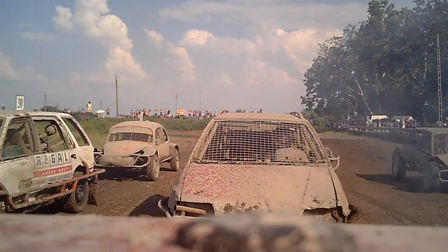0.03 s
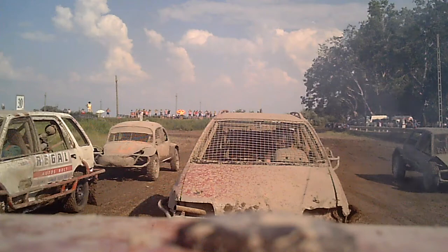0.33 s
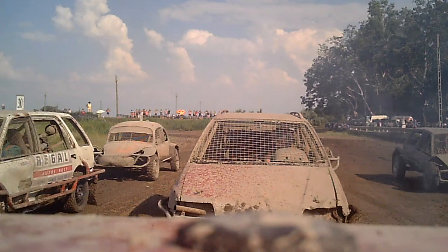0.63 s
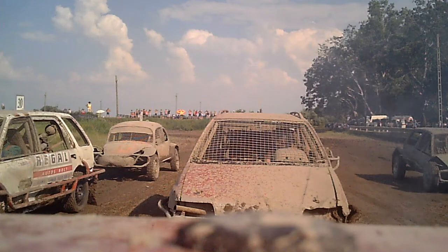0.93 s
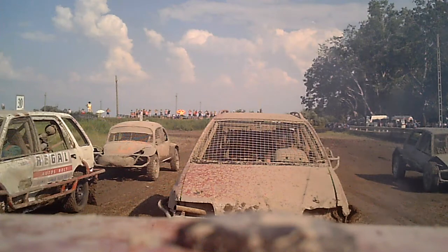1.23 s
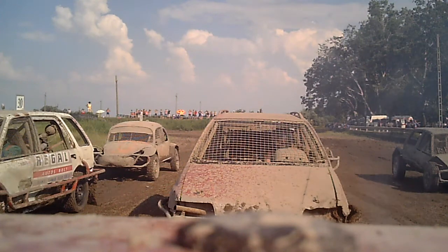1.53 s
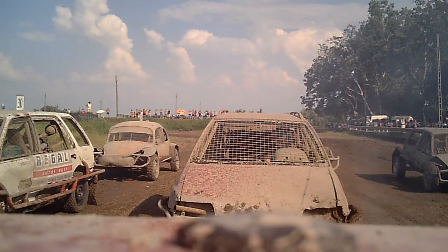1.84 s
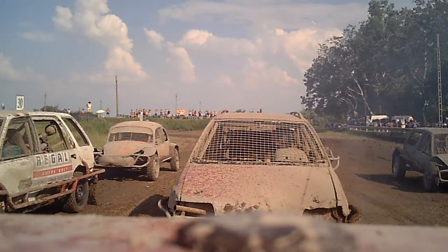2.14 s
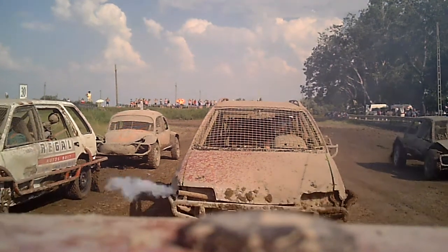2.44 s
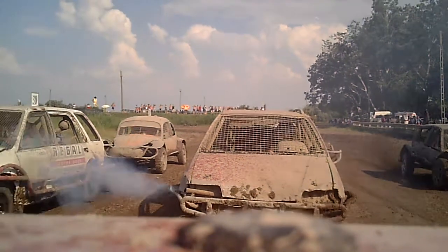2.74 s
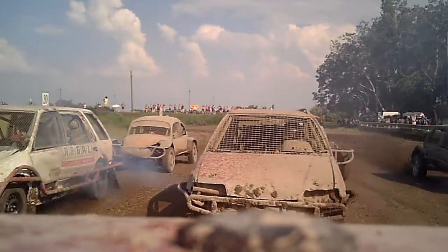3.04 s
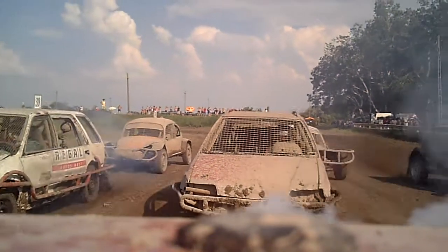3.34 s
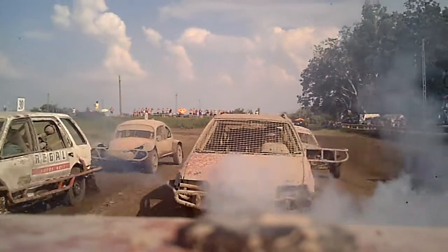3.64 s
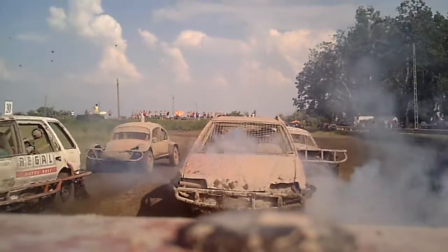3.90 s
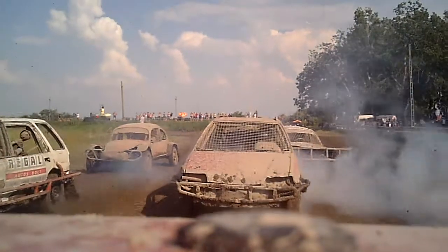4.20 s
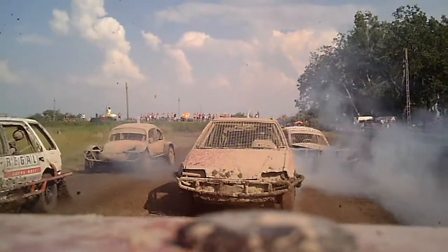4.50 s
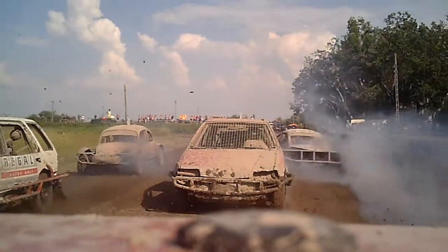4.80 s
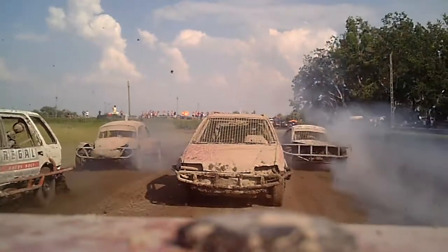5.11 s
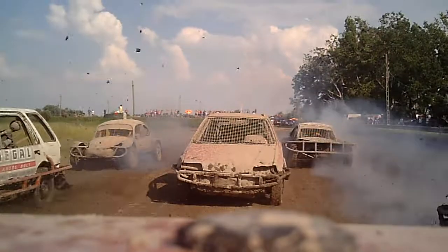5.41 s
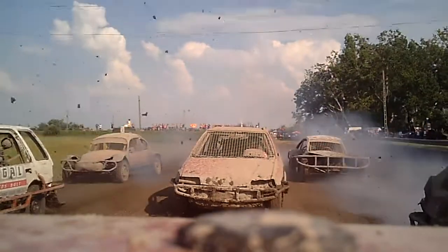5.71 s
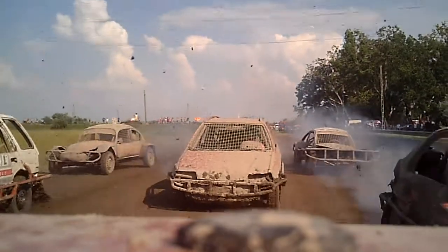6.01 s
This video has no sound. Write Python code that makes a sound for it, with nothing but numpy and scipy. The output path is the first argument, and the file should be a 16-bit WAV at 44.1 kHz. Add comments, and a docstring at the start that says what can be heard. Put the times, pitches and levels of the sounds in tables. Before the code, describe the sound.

Race car engines wait on an outdoor dirt track, heard from a microphone on one car's body. One drones at steady high revs with buzzing panels, over idle clatter and low rumble. Another blips at about 0.2, 0.8 and 1.3 seconds, among faint dry ticks. At about 1.9 seconds the cars launch with a burst of exhaust crackle, and the pack swells into a loud roar that overloads the microphone with a hissy edge. One engine climbs steadily to a scream by 4.6 seconds. A deep booming engine enters at 2.4, rises until 3.8, then falls back. A distant car adds a low rising note from 4 to 4.8. Four deep bumps thump the body between 4.7 and 5.4. The screaming engine cracks at 5.3, drops in pitch, and crackles again from 5.7, with the roar still loud at the end, just past 6 seconds.

```python
"""Stock car launch on dirt

Heard from the body of one car: engines wait, then launch, each firing a pulse down an exhaust pipe. One blips,
cracks and climbs to a scream, one drones and shakes its panels, one booms under load. The field idles, then
roars; a far car leaves late. Dry ticks dot the wait, and later a few deep thumps hit the body. The microphone
overloads on loud peaks."""
import sys
import numpy as np
from scipy import signal
from scipy.fft import rfft, irfft
from scipy.io import wavfile
from scipy.ndimage import uniform_filter1d

SR = 44100
rng = np.random.default_rng(int(sys.argv[2]) if len(sys.argv) > 2 else 0)


def waveform_to_disk(signal):
    """Save audio, clipped to [-1, 1], as 16-bit WAV at the path in sys.argv[1]."""
    frames = np.transpose(np.atleast_2d(signal))
    scaled = np.clip(frames, -1, 1) * 32767
    samples = np.round(scaled).astype(np.int16)
    wavfile.write(sys.argv[1], SR, samples)


N = 271215
TIME = np.arange(N) / SR
LAUNCH_S = 1.83


def amp(db):
    """Decibels to gain."""
    return 10 ** (np.asarray(db) / 20)


def unit(x):
    """Scale to unit rms."""
    return x / np.sqrt(np.mean(x ** 2) + 1e-20)


def curves(rows):
    """Table columns, linearly interpolated over time."""
    t_s, *columns = np.transpose(rows)
    return [np.interp(TIME, t_s, column) for column in columns]


def colour(x, spectrum, size=8192):
    """Minimum-phase filter from rows of f/Hz, gain/dB."""
    hz, db = np.transpose(spectrum)
    bins_hz = abs(np.fft.fftfreq(size, 1 / SR))
    log_gain = np.log(amp(np.interp(np.log(bins_hz + 1), np.log(hz), db)))
    response = np.exp(np.conj(signal.hilbert(log_gain)))
    taps = np.fft.ifft(response).real[:size // 2]
    return signal.oaconvolve(x, taps)[:N]


def wander(rate_hz):
    """Unit-rms random drift, rolling off at rate_hz."""
    hz = np.fft.rfftfreq(N, 1 / SR)
    return unit(irfft(rfft(rng.standard_normal(N)) * np.exp(-(hz / rate_hz) ** 2), N))


def firings(hz, jitter):
    """Running firing count of a slightly uneven crank."""
    return np.cumsum(hz * (1 + jitter * wander(24.74))) / SR


def note(cycles, rms_db):
    """One engine order as a sine."""
    return np.sqrt(2) * amp(rms_db) * np.sin(2 * np.pi * cycles)


def puffs(fired, decay_cycles, floor):
    """Gas noise bursting at each firing, over a steady floor."""
    return unit((floor + np.exp(-(fired % 1) / decay_cycles)) * rng.standard_normal(N))


def throttle(start_s, open_s, rise_s, fade_db_per_s):
    """Gain that rises as a throttle opens and fades once it shuts."""
    shut_s = np.maximum(TIME - start_s - open_s, 0)
    return np.clip((TIME - start_s) / rise_s, 0, 1) * amp(-fade_db_per_s * shut_s)


def exhaust(fired, pipe, cylinders_db, scatter_db):
    """One pulse per firing, sized by cylinder and by chance, rings the pipe."""
    shot = np.round(fired).astype(int)
    cylinder_db = np.take(cylinders_db, shot % len(cylinders_db))
    size = amp(cylinder_db + scatter_db * rng.standard_normal(N)[shot])
    per_sample = np.gradient(fired)
    offset_samples = (fired - shot) / per_sample
    pulses = np.sinc(offset_samples / 5) * np.exp(-(offset_samples / 12) ** 2) / (5 * per_sample)
    return colour(size * pulses - np.mean(size), pipe) / np.sqrt(2)


# Field loudness: t/s, level/dB
FIELD_LEVEL = [(0.12, -41), (1.0, -37.5), (1.83, -37), (1.96, -18), (2.1, -16), (2.3, -16), (2.47, -10),
               (3.0, -11.5), (3.4, -10), (4.05, -8.5), (4.55, -11.5), (4.85, -10.5), (5.36, -12),
               (5.4, -14.5), (5.7, -15.5), (5.77, -11.5), (6.15, -10)]
# Idle clatter spectrum: f/Hz, level/dB
CLATTER_SPECTRUM = [(60, -1), (130, 14), (200, 9), (300, 2), (480, -3), (750, -5.5), (930, -7.5),
                    (1200, -10.5), (2000, -18), (3200, -31), (5200, -27), (6100, -40.5), (7200, -37.5),
                    (15000, -62)]
# Exhaust roar spectrum: f/Hz, level/dB
ROAR_SPECTRUM = [(50, -14.5), (140, 5), (260, 0.5), (400, -0.5), (650, -4.5), (950, -1), (1400, -5.5),
                 (2000, -13), (3000, -19), (5000, -18), (6500, -27), (15000, -44.5)]


def field(revver_fired, droner_fired):
    """The other cars: idle clatter, buried after the launch by the roar of exhaust gas."""
    level_db, = curves(FIELD_LEVEL)
    idler_fired = firings(np.full(N, 47.5), jitter=0.028)
    clatter = puffs(idler_fired, decay_cycles=0.95, floor=1)
    clatter += puffs(droner_fired / 4, decay_cycles=0.98, floor=1)
    gas = puffs(revver_fired, decay_cycles=0.54, floor=0.48)
    launch = np.interp(TIME, [1.9, 2.1], [0, 1])
    idle = amp(np.minimum(level_db, -35) + 17.5) * unit(colour(clatter, CLATTER_SPECTRUM))
    roar = amp(level_db - 1.8 + 0.85 * wander(8.62)) * launch * unit(colour(gas, ROAR_SPECTRUM))
    return idle + roar


# Body rumble loudness: t/s, level/dB
BODY_LEVEL = [(0.12, -25), (0.5, -22.5), (0.8, -18), (1.15, -17.5), (1.4, -17.5), (1.95, -19), (2.15, -32),
              (2.45, -22.5), (3.3, -18), (3.9, -16), (4.6, -28), (4.8, -14), (5.6, -20), (6.15, -18.5)]
# Body rumble spectrum: f/Hz, level/dB
BODY_SPECTRUM = [(10, 6.5), (28, -10.5), (45, 6), (70, 2.5), (105, 1), (160, -15.5), (400, -41),
                 (2000, -82)]


def body_rumble():
    """Low noise carried through the car body."""
    level_db, = curves(BODY_LEVEL)
    return amp(level_db + 0.5) * unit(colour(rng.standard_normal(N), BODY_SPECTRUM))


# Droning engine: t/s, firing rate/Hz, firing note/dB, 2nd order/dB
DRONER_RUN = [(0.12, 143.2, -15.5, -27), (0.8, 143.2, -14, -25), (1.9, 142.1, -13, -25),
              (2.2, 143, -13.5, -19), (2.5, 142.7, -25, -14.5), (2.85, 152, -30, -16.5),
              (3.05, 155.2, -9.5, -14.5), (3.42, 148.9, -23, -9.5), (3.82, 143.1, -29, -12.5),
              (4.05, 139.9, -14.5, -18), (4.2, 145.5, -22, -15), (4.42, 161.5, -13, -17.5),
              (4.75, 171.8, -21.5, -24), (5.0, 165.1, -21, -17), (5.18, 137, -16, -13.5),
              (5.45, 137.4, -13.5, -16.5), (5.65, 141.5, -17, -12.5), (6.15, 153.9, -24, -19.5)]
# Its pipe response: f/Hz, gain/dB
DRONER_RESPONSE = [(150, -57), (300, -8.5), (450, -9), (650, -7.5), (920, 2.5), (1300, -5.5), (2000, -24.5),
                   (5000, -36), (12000, -55)]


def droning_car():
    """Engine held at high revs, hard-edged under load. Returns sound, firing count."""
    hz, note_db, octave_db = curves(DRONER_RUN)
    fired = firings(hz, jitter=0.002)
    bark = exhaust(fired, DRONER_RESPONSE, cylinders_db=[0.5, -0.5, 4.0, 1.5], scatter_db=1.9)
    load = np.interp(TIME, [1.95, 2.2], [0, 1])
    hum = note(fired, note_db - 0.2 - 0.58 * load) + note(2 * fired, octave_db - 3)
    return hum + amp(octave_db - 21 + 6.5 * load) * bark + panels(fired), fired


# Panel modes: f/Hz, half width/Hz, gain/dB
PANEL_MODES = [(912.4, 20, 6), (1913, 22, -10), (2970, 23, -29), (2880, 16, -19), (3810, 48, -23.5)]


def panels(fired):
    """One knock per four-firing engine cycle rings the sheet metal."""
    shake_db, = curves([(0.1, -39), (0.3, -31.5), (0.6, -33.5), (1.9, -34), (2.2, -27), (3, -25),
                        (3.4, -51), (4.2, -42), (6.15, -31)])
    knocks = np.diff(np.floor(fired / 4), prepend=0) * amp(1.5 * rng.standard_normal(N))
    rings = np.zeros(N)
    for hz, half_width_hz, db in PANEL_MODES:
        mode = signal.iirpeak(hz, hz / (2 * half_width_hz), SR)
        rings += amp(db) * signal.lfilter(*mode, signal.lfilter(*mode, knocks))
    return amp(shake_db) * unit(rings)


# Throttle blips: t/s, open/s, top firing rate/Hz, firing note/dB, overtones/dB, burble/dB
THROTTLE_BLIPS = [(0.19, 0.18, 62.5, -44, -35.5, -30), (0.76, 0.15, 61.8, -32, -31, -27),
                  (1.28, 0.25, 73, -29, -30.5, -28)]


def blipping(idle_hz=48.99, sag_hz_per_s=42, rise_s=0.027):
    """Blips wind the idling engine up; it sags back. Returns rate and note, bark, burble gains."""
    hz, boom, bark, puff = idle_hz, amp(-39), amp(-42.5), amp(-42.5)
    for start_s, open_s, top_hz, boom_db, bark_db, burble_db in THROTTLE_BLIPS:
        wound_hz = np.interp(TIME, [start_s, start_s + open_s], [idle_hz, top_hz])
        hz = np.maximum(hz, wound_hz - sag_hz_per_s * np.maximum(TIME - start_s - open_s, 0))
        boom = np.maximum(boom, amp(boom_db) * throttle(start_s, open_s, rise_s, fade_db_per_s=8))
        push = throttle(start_s, open_s, rise_s, fade_db_per_s=78)
        bark = np.maximum(bark, amp(bark_db) * push)
        puff = np.maximum(puff, amp(burble_db) * push)
    return hz, boom, bark, puff


# Revving car's exhaust resonances: f/Hz, half width/Hz, gain/dB
REVVER_MODES = [(69.7, 22, 19), (123, 21, -9.5), (176.2, 13.3, 9.5), (215, 15, 8.5), (261.5, 9.5, 9),
                (360, 13, -5), (409.5, 7, 8.5), (446.7, 17.2, 8.5), (519, 26, 8.5), (644, 12.7, 6.5),
                (721.3, 27, 8.5), (810.6, 9.7, 6), (920.5, 44.4, 9.5), (978.5, 16, 2)]


def resonance_db(hz):
    """Lift or dip of an order sweeping through the exhaust resonances."""
    grid_hz = np.arange(SR // 32)
    lift_db = sum(db * np.exp(-((grid_hz - centre_hz) / half_width_hz) ** 2)
                  for centre_hz, half_width_hz, db in REVVER_MODES)
    return np.interp(hz, grid_hz, lift_db)


# Revving engine from launch: t/s, firing rate/Hz, low orders/dB, high orders/dB
REVVER_RUN = [(1.83, 60.5, -27, -39), (1.93, 67.96, -25, -40), (2.03, 80.4, -22, -28.5),
              (2.14, 103.4, -27, -32.5), (2.25, 112.2, -30, -23.5), (2.38, 105, -26, -30),
              (2.6, 114.3, -27, -26.5), (3.4, 147.9, -18.5, -22), (3.6, 159.3, -20.5, -23),
              (3.9, 184, -18, -22), (4.4, 231.2, -23, -22), (4.62, 241.1, -21.5, -18.5),
              (4.86, 245.2, -25.5, -41), (5.37, 246.6, -24.5, -26), (5.43, 230.4, -30, -42),
              (5.61, 221.8, -26, -38), (5.77, 183.8, -27.5, -24), (6.15, 190.1, -22.5, -26)]
# Crank unsteadiness: t/s, jitter/fraction of speed
CRANK_JITTER = [(1.9, 0.0061), (2.1, 0.0071), (2.7, 0.0093), (3, 0.004), (5.35, .0025), (5.5, 0.012),
                (5.72, 0.014), (5.85, .01)]
# Orders 5 to 13: level/dB
SCREAM_ORDERS_DB = [0, -3, 1.5, 1.5, -2, -2, 1, -4, 0]
# Pipe response for those orders: f/Hz, gain/dB
REVVER_RESPONSE = [(300, -1), (550, 3.5), (760, -2), (850, -2.5), (1000, 3), (1130, 1), (1310, 2.5),
                   (1590, -7), (1705, -0.5), (1830, -25), (3000, -35)]


def revving_car(clutch_s=0.0704, overrun_hz_per_s=32.45, overrun_db=8):
    """Four uneven cylinders into an open pipe, blipped, then driven. Returns sound, firing count."""
    idle_hz, idle_boom, idle_bark, _ = blipping()
    drive_hz, low_db, high_db = curves(REVVER_RUN)
    clutch = np.clip((TIME - LAUNCH_S) / clutch_s, 0, 1)
    hz = (1 - clutch) * idle_hz + clutch * drive_hz
    boom_gain = (1 - clutch) * idle_boom + clutch * amp(low_db)
    low_gain = (1 - clutch) * idle_bark + clutch * amp(low_db)
    high_gain = (1 - clutch) * idle_bark * amp(-12.5) + clutch * amp(high_db)
    fired = firings(hz, jitter=curves(CRANK_JITTER)[0])
    bark = np.zeros(N)
    for order, db in enumerate([1.2, 0.3, 2.5], 2):
        cycles = order * fired + rng.random()
        bark += low_gain * note(cycles, db + resonance_db(order * hz) + 2 * wander(9.8))
    pipe_hz, pipe_db = np.transpose(REVVER_RESPONSE)
    for order, db in enumerate(SCREAM_ORDERS_DB, 5):
        colour_db = np.interp(order * hz, pipe_hz, pipe_db) + 0.45 * resonance_db(order * hz)
        swell_db = 3.54 * wander(8.7)  # shifting reflections off other cars
        bark += high_gain * note(order * fired + rng.random(), db + colour_db + swell_db)
    # Unequal cylinders: one swell per crank turn, one per cycle.
    lope = 1 + 0.13 * np.sin(np.pi * fired) + 0.062 * np.sin(np.pi * fired / 2) + 0.26 * wander(82)
    # The firing note swells as the engine slows, throttle shut.
    slowing_hz_per_s = -uniform_filter1d(np.gradient(drive_hz), size=2048) * SR
    overrun = np.clip(slowing_hz_per_s / overrun_hz_per_s, 0, 1)
    boom = boom_gain * note(fired, resonance_db(hz) + overrun_db * overrun)
    return boom + bark * lope, fired


def burble(fired):
    """Soft exhaust puffs, swelling at each blip and at the launch."""
    *_, blip_gain = blipping()
    launch_gain = amp(-15) * throttle(LAUNCH_S, open_s=0.31, rise_s=0.31, fade_db_per_s=45)
    spectrum = [(100, -22.5), (200, 3), (260, 9.5), (330, -4), (500, -0.5), (700, -0.5), (1200, -14),
                (3000, -42.5), (9000, -77.5)]
    gas = puffs(fired, decay_cycles=0.2, floor=0.27)
    return (blip_gain + launch_gain) * unit(colour(gas, spectrum))


# Ticks: t/s, level/dB
IDLE_TICKS = [(0.2309, -36), (0.2404, -40), (0.331, -33), (0.632, -43), (0.7028, -31), (0.9516, -31),
              (1.314, -33), (1.5659, -33), (1.6852, -34), (1.8206, -46), (1.8746, -32)]
# Tick spectrum: f/Hz, gain/dB
TICK_SPECTRUM = [(500, -16), (3000, 10), (5000, 1.5), (9000, 0), (15000, -5.5)]


def ticks(decay_s=0.001):
    """Short, dry noise ticks during the idle."""
    envelope = sum(amp(db) * (TIME >= t_s) * np.exp(-abs(TIME - t_s) / decay_s)
                   for t_s, db in IDLE_TICKS)
    return colour(envelope * rng.standard_normal(N), TICK_SPECTRUM)


# Revving car's throttle snaps: t/s, open/s, level/dB, fade/(dB/s)
THROTTLE_SNAPS = [(1.958, 0.44, -23, 62), (5.26, 0.091, -28.5, 300), (5.72, 0.51, -22.5, 60)]


def cracks(fired, rise_s=0.08):
    """As the throttle snaps open, each firing leaves the pipe with a sharp crack."""
    gain = sum(amp(db) * throttle(start_s, open_s, rise_s, fade_db_per_s)
               for start_s, open_s, db, fade_db_per_s in THROTTLE_SNAPS)
    spectrum = [(300, 1), (1000, 6), (1450, 17.5), (2100, 6), (2800, -29), (4200, 4.5), (5400, 5),
                (6400, -8), (8000, -9.5), (15000, -23)]
    gas = puffs(fired, decay_cycles=0.22, floor=0.03)
    return gain * unit(colour(gas, spectrum))


# Booming engine: t/s, firing rate/Hz, firing note/dB
BOOMER_RUN = [(2.42, 126.8, -17), (2.6, 130, -12), (2.9, 158.4, -7), (3.22, 188.1, -6.5),
              (3.45, 200.2, -12), (3.82, 209.4, -10), (3.97, 197.7, -17.5), (4.12, 167.9, -7),
              (4.22, 149.1, -9.5), (4.36, 133.1, -17.5), (4.62, 126.4, -15), (4.84, 131.6, -10.5),
              (5.3, 125.2, -21), (5.5, 131.1, -19.5), (5.72, 144, -8.5), (5.9, 152.7, -7),
              (6.15, 152.2, -13)]
# Its silencer response: f/Hz, gain/dB
BOOMER_RESPONSE = [(150, -25), (350, -2.5), (600, 1.5), (1000, -1), (1450, 0), (2500, -33), (6000, -49)]


def booming_car():
    """Deep silencer: a throbbing firing note once the clutch bites, overtones near top revs."""
    hz, note_db = curves(BOOMER_RUN)
    fired = firings(hz, jitter=0.00282)
    bark = exhaust(fired, BOOMER_RESPONSE, cylinders_db=[-1.2, -7.0, -5.0, -0.5], scatter_db=0.5)
    bark_db = np.interp(hz, [130, 205], [-32, -22])
    boom = note(fired, note_db + 0.26 + 1.104 * wander(24))
    clutch = np.interp(TIME, [2.38, 2.48], [0, 1])
    return clutch * (boom + amp(bark_db) * bark)


# Far engine: t/s, firing rate/Hz, firing note/dB
STRAGGLER_RUN = [(3.1, 42.04, -51), (3.6, 64.25, -36), (4, 79.97, -14), (4.1, 85.66, -25), (4.2, 93, -12),
                 (4.4, 109.5, -16.5), (4.56, 119.7, -12), (4.75, 125, -18), (5, 131.2, -60)]


def straggler():
    """A far car pulls away late; only its low firing note carries."""
    hz, note_db = curves(STRAGGLER_RUN)
    return note(firings(hz, jitter=0.0078), note_db)


# Body jolts: t/s, f/Hz, level/dB
BODY_JOLTS = [(4.706, 65.2, -9), (4.872, 71, -7), (5.255, 61.6, -8), (5.385, 82.65, -6)]


def jolts(decay_s=0.041):
    """A few deep thumps shake the body into short swings."""
    thumps = np.zeros(N)
    for start_s, hz, db in BODY_JOLTS:
        age_s = np.maximum(TIME - start_s, 0)
        thumps += amp(db) * np.exp(-age_s / decay_s) * np.sin(2 * np.pi * hz * age_s)
    return thumps


# Open-throttle lift on all but the ticks: t/s, gain/dB
THROTTLE_SURGE = [(0.12, 2), (1.3, 0), (1.8, 0), (2.2, 3), (2.5, 5.5), (2.9, 2.5), (4.4, 5), (4.9, 6.5),
                  (5.45, 7), (5.65, 6.5), (5.85, 8), (6.15, 6.5)]


def scene():
    """All cars in mono, swelling as the throttles open."""
    revver, revver_fired = revving_car()
    droner, droner_fired = droning_car()
    near_car = revver + cracks(revver_fired) + burble(revver_fired)
    cars = near_car + droner + booming_car() + straggler() + field(revver_fired, droner_fired)
    body = body_rumble() + jolts()
    surge_db, = curves(THROTTLE_SURGE)
    return (amp(surge_db) * (cars + body) + ticks())[None]


def record(dry):
    """Peaks flatten in overload; a fine hiss rides on the loud, harsh passages."""
    start_s, fade_s = 0.118, 0.006
    ceiling, knee, cutoff_hz = 0.68, 8, 15700
    x = dry[0] * np.clip((TIME - start_s) / fade_s, 0, 1)
    flattened = x / (1 + abs(x / ceiling) ** knee) ** (1 / knee)
    curvature = np.diff(flattened, 2, prepend=[0, 0])
    harshness = np.sqrt(abs(uniform_filter1d(curvature ** 2, size=600)))
    hiss = amp(-14.5) * harshness * rng.standard_normal(N)
    low_pass = signal.firwin(1023, cutoff_hz, window=("kaiser", 9), fs=SR)
    return signal.oaconvolve(flattened + hiss, low_pass, "same")[None]


dry = scene()
out = record(dry)
waveform_to_disk(out)
```